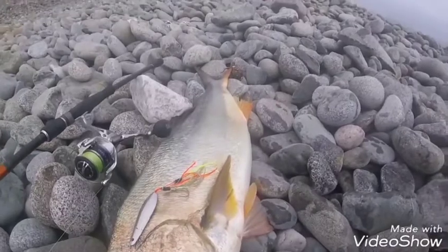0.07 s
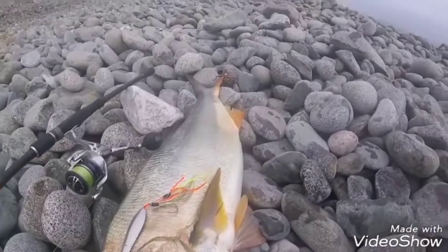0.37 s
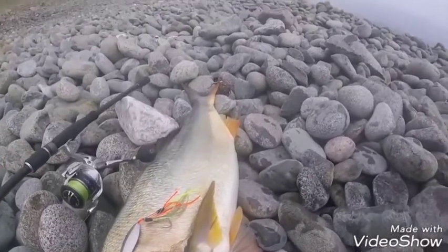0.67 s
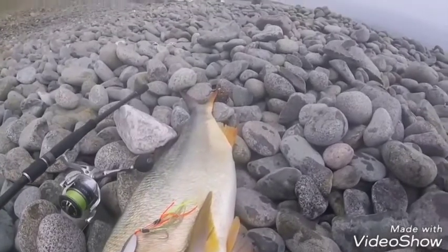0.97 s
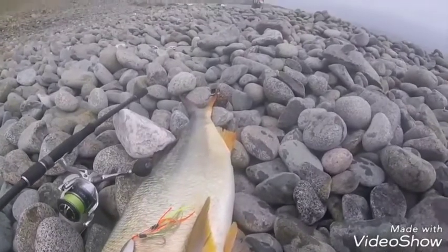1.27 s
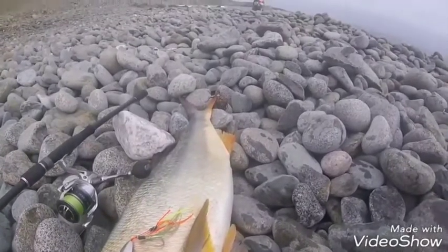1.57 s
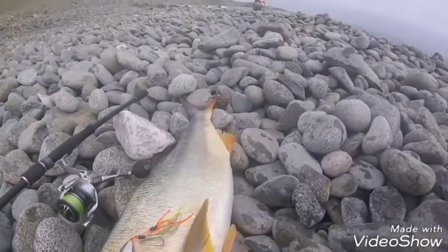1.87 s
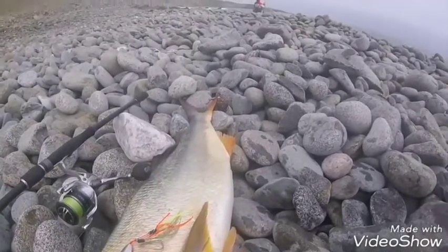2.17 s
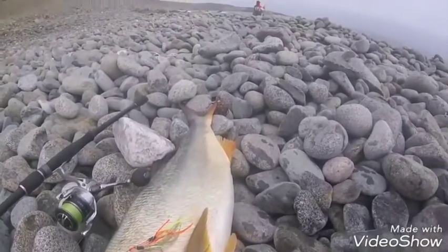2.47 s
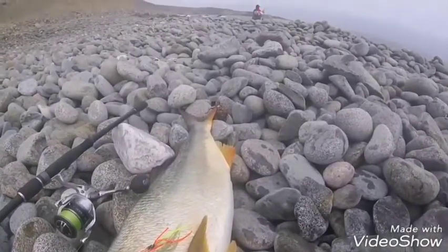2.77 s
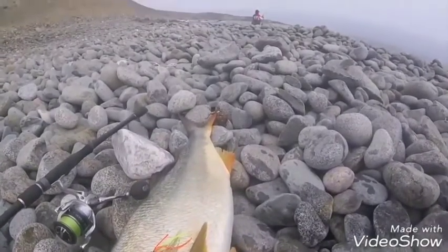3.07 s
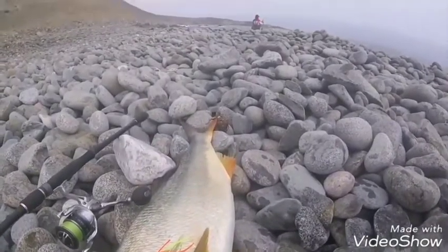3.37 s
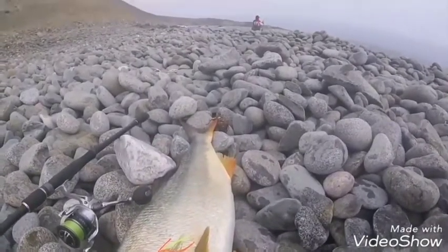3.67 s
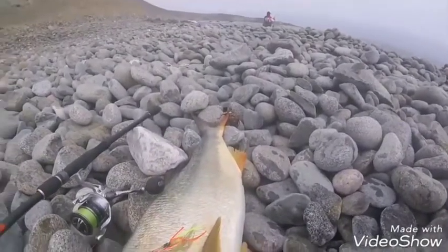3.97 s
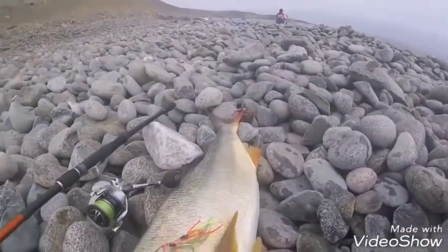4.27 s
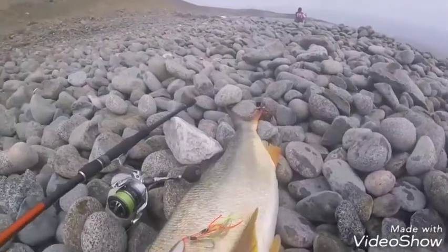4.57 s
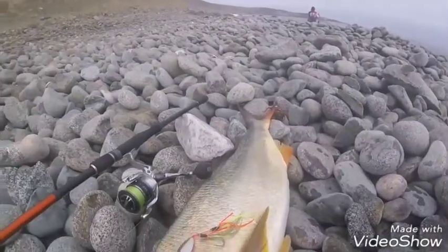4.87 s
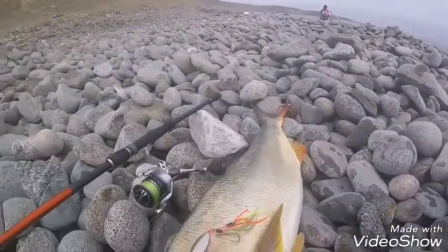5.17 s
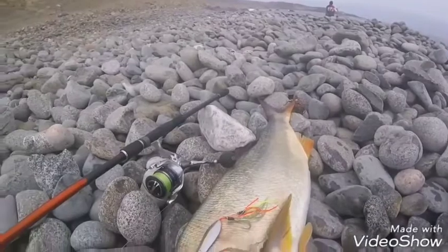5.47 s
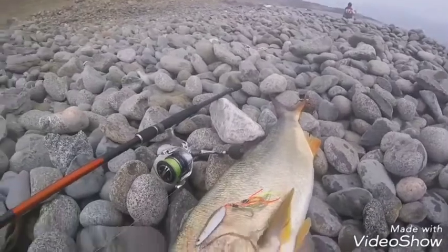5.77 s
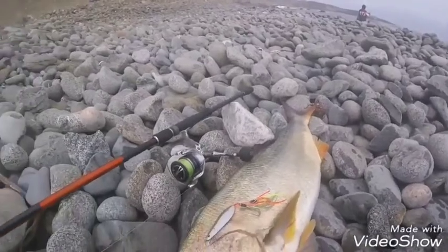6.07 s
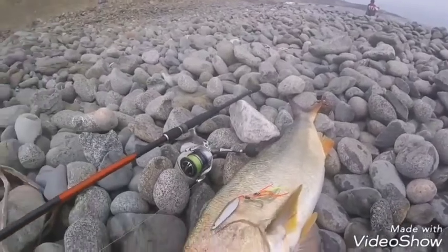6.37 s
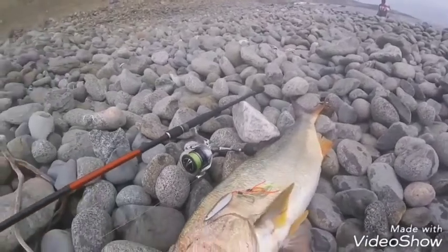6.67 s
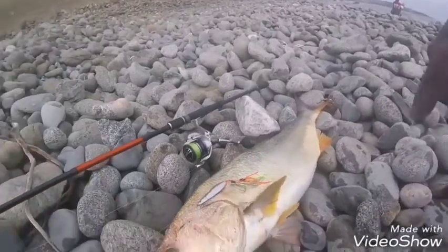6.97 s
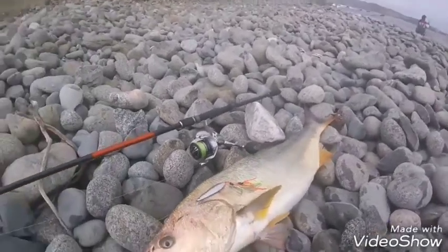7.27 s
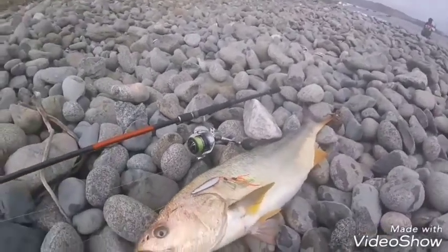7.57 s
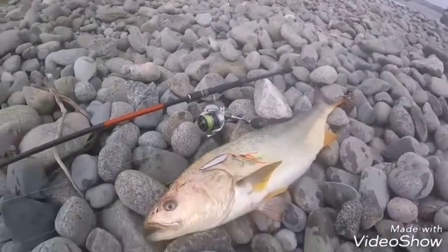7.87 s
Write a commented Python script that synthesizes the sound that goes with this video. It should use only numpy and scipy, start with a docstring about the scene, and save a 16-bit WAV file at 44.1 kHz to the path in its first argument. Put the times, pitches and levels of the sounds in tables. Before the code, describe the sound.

Wind rumbles on the microphone while distant surf washes over a pebble beach, with a few soft bumps and sleeve rustles.

```python
"""Wind and surf on a cobble beach.

Heard from a body-worn camera in a plastic case. Right at the microphone, eddies buffet the case into
a low rumble; beyond it one wave drains away, and after a lull two more run up the stones.
A sleeve brushes past and the case takes a few soft bumps; it rings faintly in the treble,
and its electronics hiss and whine."""
import sys
import numpy as np
from scipy import signal
from scipy.fft import rfft, irfft
from scipy.io import wavfile
from scipy.ndimage import uniform_filter1d

SR = 44100
rng = np.random.default_rng(int(sys.argv[2]) if len(sys.argv) > 2 else 0)


def output_pcm(signal):
    """Save a mono or channel-first signal as 16-bit PCM at the path in sys.argv[1].

    Samples are clipped to [-1, 1] before scaling.
    """
    pcm = np.clip(np.atleast_2d(signal).T, -1, 1) * 32767
    wavfile.write(sys.argv[1], SR, np.round(pcm).astype(np.int16))


N = 358091
T = np.arange(N) / SR

# treble resonances of the case around the microphone: f/Hz, width/Hz, level/dB over the direct sound
CASE_MODES = [(4870, 660, -1), (5520, 420, -1), (6495, 450, 8.5)]


def undb(db):
    """Decibels to gain."""
    return 10 ** (np.asarray(db) / 20)


def unit(x):
    """Scale to an rms of one."""
    return x / np.sqrt(np.mean(x ** 2))


def colour(x, spectrum, modes=()):
    """Give x a smooth spectrum with resonances on top; rms one."""
    hz = np.maximum(np.arange(N // 2 + 1) * SR / N, 1)
    points_hz, points_db = np.transpose(spectrum)
    gain = undb(np.interp(np.log(hz), np.log(points_hz), points_db, left=-80, right=-80))
    resonance = sum(undb(db) ** 2 / (1 + (2 * (hz - f) / width) ** 2) ** 2 for f, width, db in modes)
    return unit(irfft(rfft(x) * gain * np.sqrt(1 + resonance), N))


def noise(spectrum, modes=()):
    """Coloured Gaussian noise; rms one."""
    return colour(rng.standard_normal(N), spectrum, modes)


def wander(rate_hz):
    """A smooth random drift; rms one."""
    span = max(int(SR / rate_hz), 2)
    steps = np.repeat(rng.standard_normal(N // span + 1), span)
    return unit(uniform_filter1d(uniform_filter1d(steps, span), span)[:N])


def patter(per_s, spread_db):
    """Countless tiny impacts, most weak and a few strong."""
    hits = rng.random(N) < per_s / SR
    signs = rng.choice([-1, 1], N)
    strength_db = spread_db * np.minimum(rng.exponential(size=N), 5)
    return unit(hits * signs * undb(strength_db))


def ring(age, hz, t60):
    """One struck mode dying away."""
    return np.sin(2 * np.pi * hz * age) * np.exp(-np.log(1000) * age / t60)


def electronics(hiss_db=-68.5, waver_db=1.5):
    """The noise floor: steady microphone hiss and a thin, wavering whine."""
    # spectrum of the hiss: f/Hz, relative level/dB
    hiss_spectrum = [(500, -1), (2500, 5.5), (4200, -7), (5300, -1.5), (6000, -2), (6700, 5), (7800, 4),
                     (9500, 0.5), (10400, -8.5), (11800, -3.5), (13500, -10.5), (15000, -34)]
    # tones of the whine: f/Hz, rms level/dB
    whine_tones = [(716.0, -78.7), (834.4, -78.7), (952.8, -81.5)]
    whine = 0
    for hz, db in whine_tones:
        amplitude = np.sqrt(2) * undb(db + waver_db * wander(1.5))
        whine += amplitude * np.sin(2 * np.pi * (hz * T + rng.random()))
    return undb(hiss_db) * noise(hiss_spectrum, CASE_MODES) + whine


def sleeve_brushes():
    """Close by, fibres catch and slip by the thousand; each stroke rubs, swishes and drags on the case."""
    # sleeve strokes: t/s, length/s, rise/s, fall/s, rub level/dB, swish level/dB, drag level/dB
    strokes = [(2.897, 0.049, .02, .02, -71, -88, -67), (3.83, .045, .02, .02, -78, -88, -70),
               (4.97, 0.097, .06, .04, -69, -84, -72), (5.444, 0.044, .02, .04, -73, -81, -61),
               (5.968, 0.14, 0.16, 0.07, -57, -61, -50.5), (6.215, 0.063, .03, 0.069, -63, -68, -58.5),
               (6.71, 0.12, 0.088, 0.04, -53.5, -54, -66), (6.833, 0.088, 0.064, 0.043, -62, -54, -57),
               (6.93, 0.095, 0.038, 0.036, -70, -55.5, -63), (7.062, 0.039, .015, 0.047, -60, -63, -70),
               (7.18, 0.29, 0.073, 0.08, -60.5, -66.5, -61), (7.645, 0.055, 0.006, .01, -59, -74, -55),
               (7.734, 0.077, 0.025, 0.03, -64, -61, -51), (7.877, 0.01, 0.0057, 0.006, -55, -95, -55),
               (7.963, .16, 0.057, .04, -77, -66, -55.5)]
    # spectra of cloth rubbing, swishing and dragging: f/Hz, relative level/dB
    rub_spectrum = [(800, -6), (2500, -2.5), (3600, -1.5), (4500, -3), (5400, 0), (6000, -20), (7500, -16),
                    (9400, -11), (10500, -40)]
    swish_spectrum = [(2000, -12), (4300, -8), (5400, 4.5), (6100, -2), (7500, -3), (9400, -6.5),
                      (10400, -18.5), (12000, -27), (14000, -43)]
    drag_spectrum = [(250, -16), (650, 4.5), (1000, 5.5), (1400, -0.5), (2000, -1), (2800, -5), (3600, -10),
                     (5000, -25), (9000, -24)]
    fibres = patter(per_s=12000, spread_db=1.5)
    rub = colour(fibres, rub_spectrum, CASE_MODES) * undb(wander(63))
    swish = noise(swish_spectrum, CASE_MODES) * undb(0.46 * wander(40))
    drag = noise(drag_spectrum)
    out = np.zeros(N)
    for start, length, rise, fall, rub_db, swish_db, drag_db in strokes:
        age = T - start
        envelope = np.clip(age / rise, 0, 1) * np.exp(-np.maximum(age - length, 0) / fall)
        out += envelope * (undb(rub_db) * rub + undb(swish_db) * swish + undb(drag_db) * drag)
    return out


def sleeve_scrapes(width_hz=900, edge_s=0.019):
    """Where the cloth catches hard on the case, it chatters in a narrow, gritty band."""
    # catches of the cloth: t/s, length/s, f/Hz, level/dB before the fades
    catches = [(4.748, .022, 5200, -69), (6.904, .02, 6520, -52), (6.99, .042, 5350, -49),
               (7.06, .025, 5400, -59), (7.66, .045, 5050, -55), (7.752, .048, 4950, -50.5),
               (7.788, .055, 4900, -53.5), (7.879, .016, 4700, -56)]
    # spectrum of the grit: f/Hz, relative level/dB
    grit_spectrum = [(1500, -6), (4000, 4), (6800, -6), (9400, -1), (10500, -32)]
    grit = colour(patter(per_s=4000, spread_db=1.2), grit_spectrum)
    out = np.zeros(N)
    for start, length, hz, db in catches:
        rasp = unit(signal.lfilter(*signal.iirpeak(hz, hz / width_hz, fs=SR), grit))
        fades = np.clip(np.minimum(T - start, start + length - T) / edge_s, 0, 1)
        out += undb(db) * rasp * fades
    return out


def case_bumps(contact_cycles=0.42):
    """Each knock rocks the case on its mount: a low thump and a shell clack, some faint, some sharp."""
    # knocks and slaps of wind: t/s, thump peak level/dB, f/Hz, t60/s, clack peak level/dB
    knocks = [(0.378, -26, 90, 0.06, -62), (0.522, -24, 87, 0.063, -62), (0.893, -30, 98, 0.054, -55),
              (1.086, -23, 98, 0.13, -61), (1.297, -26, 103, 0.06, -60), (1.513, -26, 97, 0.18, -59),
              (2.79, -34, 248, 0.081, -58), (4.655, -36.5, 235, 0.093, -49),
              (5.135, -25.5, 100, 0.058, -63), (5.438, -32, 111, 0.036, -40), (5.866, -22, 285, 0.06, -57),
              (5.928, -22, 99, 0.1, -58), (6.086, -23.5, 272, 0.093, -46), (6.282, -23, 210, 0.021, -33),
              (6.419, -23.5, 119, 0.026, -52), (6.86, -22, 123, 0.033, -38),
              (7.158, -22.5, 210, 0.064, -57), (7.489, -24, 75.6, 0.067, -40),
              (7.650, -19, 123, 0.039, -26), (7.702, -23.5, 132, 0.047, -39),
              (7.874, -20.5, 170, 0.02, -47), (7.968, -25.5, 109, 0.033, -38)]
    # modes of the shell: f/Hz, relative level/dB, t60/s
    shell_modes = [(310, 7, 0.024), (480, 3, 0.026), (690, 2, .016), (850, -2, 0.014), (1080, -9, .012),
                   (2400, -22, .012), (5300, -22, .008)]
    out = np.zeros(N)
    for start, thump_db, hz, t60, clack_db in knocks:
        now = (T >= start) & (T < start + 2 * t60)
        age = T[now] - start
        thump = ring(age, hz, t60) * (1 - np.exp(-age * hz / contact_cycles))
        clack = sum(undb(db) * ring(age, f, decay) for f, db, decay in shell_modes)
        out[now] += undb(thump_db) * thump / np.abs(thump).max()
        out[now] += undb(clack_db) * clack / np.abs(clack).max()
    return out


def swell(t, far_surf_db=-71.5, approach_db=-10.5, approach_db_per_s=3.5, run_up_s=0.25,
          surge_after_s=0.2, surge_width_s=0.2, drain_db_per_s=8.5):
    """Surf level in dB: over the distant shore, each wave nears, surges up the beach and drains away."""
    # waves on the stones: arrival t/s, time before draining/s, level/dB, surge on landing/dB
    waves = [(-0.05, 1.17, -63.2, 4), (5.76, 2.5, -56.8, 3.2), (7.05, 1, -61.5, 1.5)]
    power = undb(far_surf_db) ** 2
    for arrival, hold, db, landing_db in waves:
        age = t - arrival
        nearing = undb(approach_db + approach_db_per_s * np.minimum(age, 0))
        run_up = (1 + np.tanh(age / run_up_s)) / 2
        onset = nearing + (1 - nearing) * run_up
        surge_db = landing_db * np.exp(-((age - surge_after_s) / surge_width_s) ** 2)
        drain_db = drain_db_per_s * np.maximum(age - hold, 0)
        power += (undb(db + surge_db - drain_db) * onset) ** 2
    return 10 * np.log10(power)


def surf(full_wave_db=-55, full_foam_db=-59, foam_growth=1.03, churn_db=0.6,
         foam_lead_s=0.04, roar_lag_s=0.31):
    """Water hisses over cobbles, which clack together; foam fizzes and the low roar comes last."""
    # spectra of the wash, the roar and the foam: f/Hz, relative level/dB
    wash_spectrum = [(400, -13), (800, -2), (1200, 0.5), (2000, -1), (2800, -4.5), (3600, -10),
                     (5000, -14.5), (9000, -25)]
    roar_spectrum = [(250, -12), (600, -3), (850, -3), (1200, -9), (2000, -24)]
    foam_spectrum = [(1500, -16), (3000, 4.5), (4200, 0), (5400, 5.5), (6100, -7), (7200, -2), (9400, -7.5),
                     (10400, -50), (14000, -55)]
    surf_db = swell(T)
    foam_db = full_foam_db + foam_growth * (swell(T + foam_lead_s) - full_wave_db)
    wash = noise(wash_spectrum) * undb(surf_db - 1.1 + churn_db * wander(14))
    roar = noise(roar_spectrum) * undb(swell(T - roar_lag_s))
    stones = colour(patter(per_s=400, spread_db=1.0), wash_spectrum) * undb(surf_db - 11)
    fizz = colour(patter(per_s=14000, spread_db=2.5), foam_spectrum, CASE_MODES)
    foam = fizz * undb(foam_db + churn_db * wander(21))
    return wash + roar + stones + foam


def eddies(spectrum, steadiness, span_s):
    """Turbulent pressure; a sustained flow keeps its strength from straying far."""
    pressure = noise(spectrum)
    power = uniform_filter1d(pressure ** 2, int(span_s * SR))
    return unit(pressure / (power + 1e-9) ** (steadiness / 2))


def wind(brighten=0.91, finest_above_hz=480, finest_trim_db=-2.0, flutter_db=0.5):
    """At the microphone the flow rumbles, large eddies thud on the case and small ones flutter."""
    # two gusts with a long lull between: t/s, rumble level/dB, large-eddy level/dB, small-eddy level/dB
    gusts = [(0.0, -46, -37.5, -42), (0.35, -34.5, -35.5, -42.5), (0.9, -47, -33.5, -41),
             (1.35, -41.5, -35, -40), (2.25, -43, -37, -43.5), (2.8, -46, -43.5, -47.5),
             (3.3, -50.5, -47, -51.5), (3.9, -48.5, -49, -56), (4.45, -44, -49.5, -53),
             (4.95, -47, -45, -47), (5.4, -45.5, -42, -43), (5.9, -43.5, -38, -38), (6.3, -43, -34.5, -36),
             (6.95, -35.5, -36, -35.5), (7.7, -37, -36, -35.5), (8.12, -35, -35, -37)]
    # spectra of the deep rumble, the large and the small eddies: f/Hz, relative level/dB
    rumble_spectrum = [(12, -15), (25, -7.5), (45, -2), (68, -.5), (85, -4), (130, -24.5)]
    large_spectrum = [(45, -21.5), (72, -1.5), (102, 1), (135, -4), (175, -9), (260, -14.5), (500, -40)]
    small_spectrum = [(90, -46), (160, -6), (220, 0.5), (285, 1), (325, -4.5), (380, -8.5), (440, -12.5),
                      (510, -11), (620, -18), (780, -27.5), (1100, -33), (2500, -68)]
    times, *levels = np.transpose(gusts)
    rumble_db, large_db, small_db = [np.interp(T, times, db) for db in levels]
    rumble = eddies(rumble_spectrum, steadiness=0.15, span_s=0.48) * undb(rumble_db)
    large = eddies(large_spectrum, steadiness=0.37, span_s=0.089) * undb(large_db)
    small = eddies(small_spectrum, steadiness=0.3, span_s=0.28)
    small *= undb(small_db + flutter_db * wander(25))
    # the small eddies sound brighter when they dominate the flow
    finest = signal.sosfiltfilt(signal.butter(2, finest_above_hz, "high", fs=SR, output="sos"), small)
    dominance_db = uniform_filter1d(small_db - large_db, SR // 2)
    finest_gain = undb(brighten * (dominance_db - dominance_db.mean()) + finest_trim_db)
    return rumble + large + small + finest * (finest_gain - 1)


def scene():
    """Everything meets at one body-worn microphone on the beach."""
    return (wind() + surf() + sleeve_brushes() + sleeve_scrapes() + case_bumps() + electronics())[None]


def record(dry):
    """The camera cuts the treble above 14.3 kHz."""
    return signal.sosfilt(signal.ellip(8, 0.2, 70, 14300, fs=SR, output="sos"), dry)


dry = scene()
out = record(dry)
output_pcm(out)
```